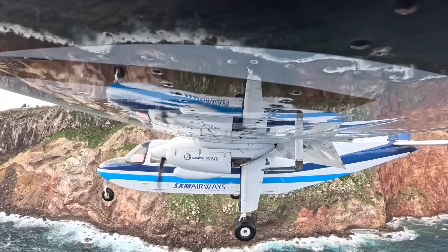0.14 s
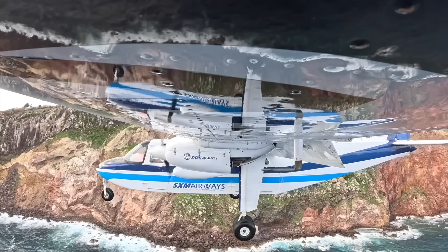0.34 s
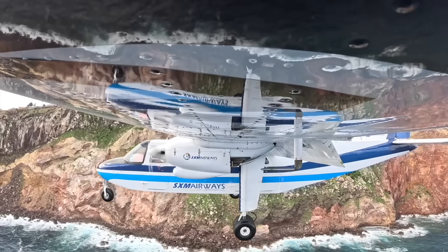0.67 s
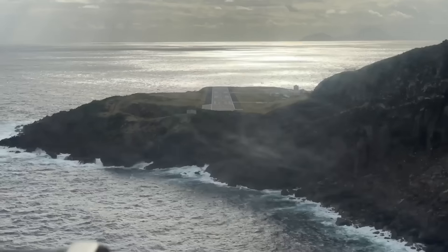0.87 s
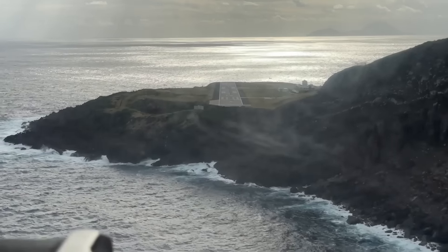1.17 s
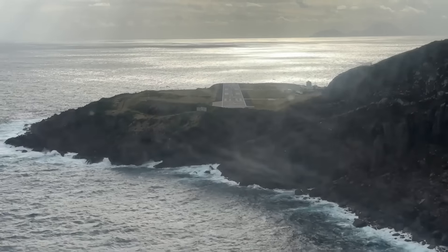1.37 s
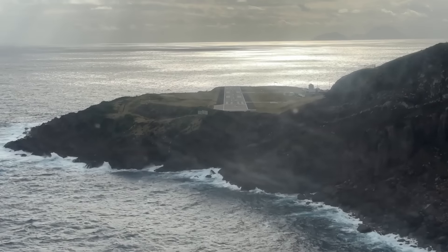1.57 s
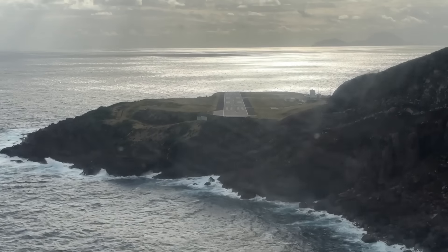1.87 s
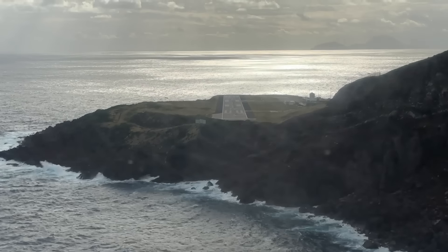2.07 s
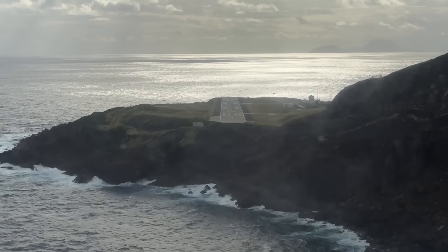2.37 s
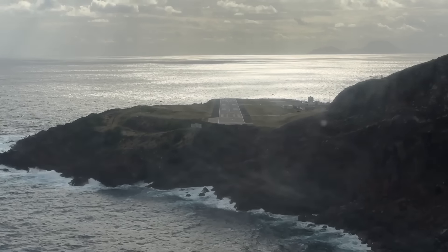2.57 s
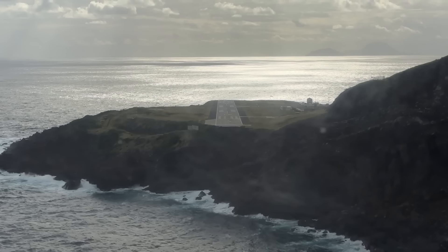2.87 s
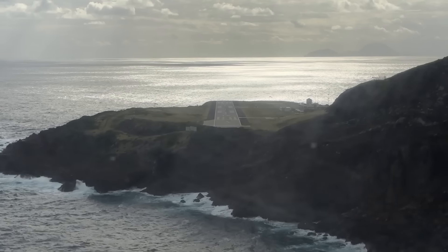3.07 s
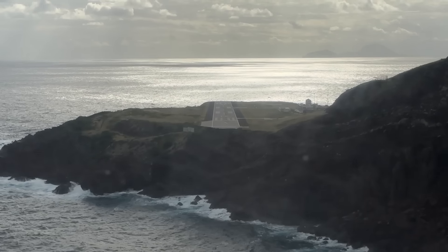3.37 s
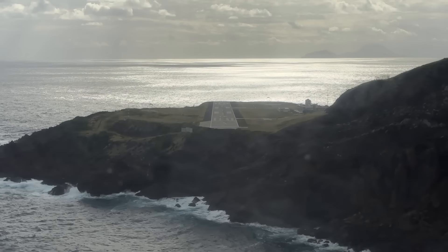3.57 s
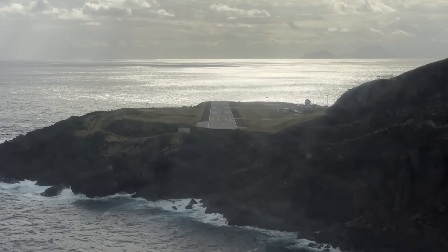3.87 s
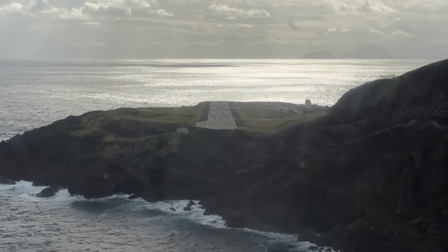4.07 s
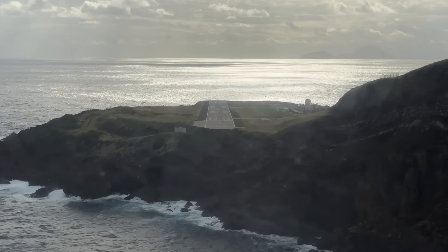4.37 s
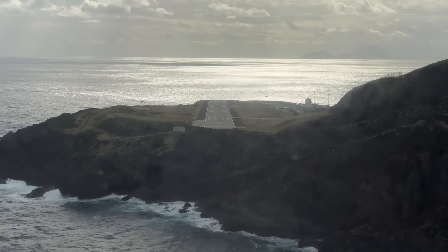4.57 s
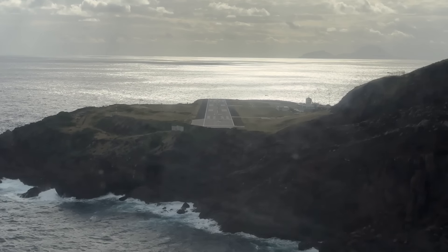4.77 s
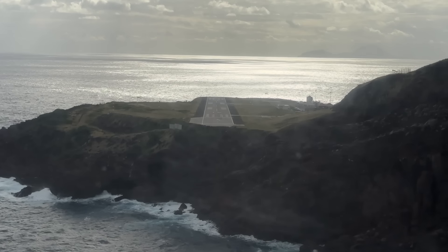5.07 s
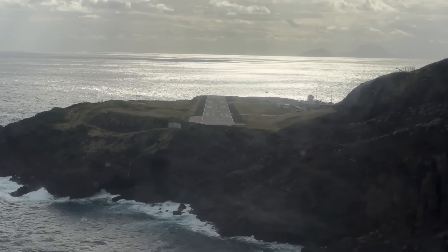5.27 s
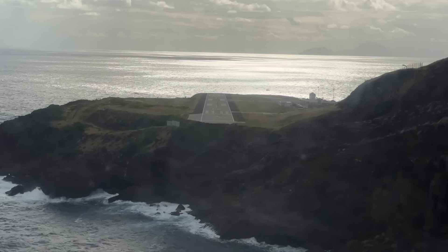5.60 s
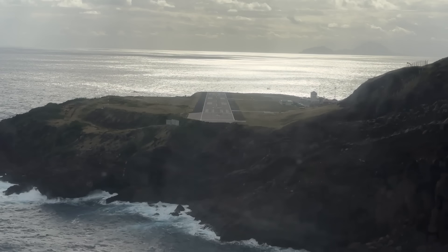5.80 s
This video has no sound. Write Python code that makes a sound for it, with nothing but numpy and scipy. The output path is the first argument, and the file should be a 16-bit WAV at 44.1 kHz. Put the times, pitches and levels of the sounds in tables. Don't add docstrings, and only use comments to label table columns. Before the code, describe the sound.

From 0 to about 0.78 seconds, a light twin-propeller plane is heard close outside in open air: a deep, uneven exhaust bark, breathy roar, and a whine climbing from about 2.07 to 2.19 kHz, the loud peaks softly rounded. An almost instant cut enters the cabin. Two piston engines a few per cent apart drone with boomy low resonance and a quick throbbing beat. The nearer engine's whine glides from about 2.58 kHz to 2.69 by 4 seconds; the farther one is fainter and lower. Slipstream rushes underneath, crisp trim hiss flickers with the blades, slowly weakening and settling slightly near 3.1. Brief, faint panel buzzes around 600 Hz come and go, mostly from 1.3 to 4.6 and again after 5.6. Very thin high tones persist, one growing until 4. From 4.6 the near engine rises towards 2.85 kHz, rumble swelling slightly, still running at the end, about 5.9.

```python
import sys
import numpy as np
from scipy import signal
from scipy.fft import rfft, irfft
from scipy.io import wavfile
from scipy.ndimage import uniform_filter1d

SR = 44100
rng = np.random.default_rng(int(sys.argv[2]) if len(sys.argv) > 2 else 0)


def wav_out(sig):
    wavfile.write(sys.argv[1], SR, np.round(np.clip(np.atleast_2d(sig).T, -1, 1) * 32767).astype(np.int16))


def boost_factor(decibels):
    exponent = np.asarray(decibels, float) / 20
    return 10 ** exponent


N = 261954

# (time [s], whine [Hz], blade thrust [dB])
NEAR_ENGINE = [(.84, 2577.3, -3.5), (1.34, 2614.8, -.7), (1.59, 2629.3, .1), (1.84, 2642.3, .1),
               (2.34, 2664.3, 0), (2.84, 2676.7, .3), (3.34, 2685.2, -.2), (4.09, 2693.7, -1.3),
               (4.59, 2696.9, -.8), (4.84, 2733.8, -.7), (5.09, 2770.2, -1.2), (5.34, 2796.1, -2.1),
               (5.59, 2824.4, -1.8), (5.89, 2847.0, -1)]
# (time [s], whine [Hz], blade thrust [dB])
FAR_ENGINE = [(.84, 2387.5, 4.2), (1.14, 2419.4, 3.7), (1.74, 2463.4, 1), (2.04, 2470, -.1),
              (2.64, 2505.1, -1.5), (3.24, 2513, -.5), (4.14, 2524.3, -.4), (5.04, 2527.2, -.3),
              (5.64, 2552.4, .6), (5.89, 2556.5, 1)]
# (multiple of shaft rate [1], level [dB])
NEAR_ORDERS = [(2, -32), (3, -35), (4, -24), (4.5, -40), (5, -56), (5.5, -48), (6, -27.7), (7, -57),
               (8, -52), (9, -62), (10, -45), (12, -49), (14, -50), (15, -62), (16, -62), (21, -64)]
FAR_ORDERS = [(3, -43), (4, -38), (4.5, -47), (6, -37), (2, -46), (7, -52), (8, -57), (9, -57), (10, -47),
              (12, -53), (15, -61), (16, -60)]
# (frequency [Hz], gain [dB])
CABIN_MODES = [(64, 0), (67, 4), (72.5, -4), (74, -10), (98, 0), (101.5, 3), (105, -2), (107, 2), (111, 7),
               (118, 7), (124, 0), (283, 0), (291, 5), (306, 0)]
# (frequency [Hz], density [dB per Hz])
SLIPSTREAM_SPECTRUM = [(30, -20), (50, 8), (80, 4), (130, 12), (200, 6.5), (260, 0.5), (450, -1), (800, -4),
                       (1150, -9.5), (1900, -8.5), (2250, -6), (2900, -11.5), (4400, -16.5), (5800, -20.5)]
# (frequency [Hz], density [dB per Hz])
TRIM_SPECTRUM = [(4800, -3), (5900, -1), (7400, -1), (8800, -4.5), (10500, -1.5), (12000, -3.5),
                 (14000, -6), (15750, -7)]
# (frequency [Hz], width [Hz], level [dB])
PANEL_MODES = [(642, 24, 0), (612, 25, -12)]
# (middle [s], length [s], level [dB])
BUZZ_SPELLS = [(1.322, .02, -46), (1.44, .03, -40.5), (1.532, 0.018, -45), (1.72, .04, -44),
               (1.92, .04, -47), (2.1, .04, -45), (2.25, .06, -47), (2.64, .08, -46), (2.873, .12, -45),
               (3.05, .03, -44), (3.22, .12, -45), (3.436, .05, -42), (3.604, .08, -46.5),
               (3.867, .03, -48), (4.01, .12, -43), (4.18, .04, -42.5), (4.42, .06, -47), (4.6, .03, -47),
               (5.6, .02, -43), (5.69, .03, -43), (5.84, .05, -42)]
# (frequency [Hz], level [dB])
CABIN_TONE = [(10544, -69.5)]
# (time [s], level [dB])
TONE_SWELL = [
    (1.6, -7),
    (3.8, -3),
    (4, 1.5),
]
# (frequency [Hz], level [dB])
INSTRUMENTS = [(9322, -80), (10907, -73), (11445, -74)]
# (time [s], shaft rate [Hz])
OUTSIDE_SHAFT = [
    (0, 33.7),
    (.25, 33.7),
    (.5, 34.0),
    (.77, 34.1),
]
# (multiple of shaft rate [1], level [dB])
EXHAUST_ORDERS = [(2, -37), (3, -24.5), (3.5, -42), (4, -38), (4.5, -33), (5.5, -36), (6, -30.5),
                  (6.5, -41), (7, -35), (7.5, -41), (8.5, -43), (9, -46), (10, -43), (11.5, -41), (12, -42),
                  (14.5, -43)]
# (time [s], frequency [Hz])
OUTSIDE_WHINE = [(.05, 2068.1), (.17, 2074.1), (.29, 2086.8), (.41, 2106.4), (.53, 2129.9), (.65, 2163.1),
                 (.72, 2178.1), (.78, 2192)]
# (multiple of whine [1], level below whine [dB])
OUTSIDE_OVERTONES = [(3, -27), (4, -37)]
# (frequency [Hz], density [dB per Hz])
ROAR_SPECTRUM = [(30, -30), (55, -14), (90, -8.5), (220, -9.5), (500, -15.5), (1000, -21), (2000, -22.5),
                 (3500, -28), (4500, -35), (6400, -48.5), (7200, -54), (9000, -59), (11000, -57.5),
                 (15700, -63)]
# (frequency [Hz], level [dB])
AIRFRAME_WHISTLES = [(1174, -52), (2449, -55), (3090, -58)]
# (frequency [Hz], gain [dB])
OPEN_AIR = [(20, 0), (20000, 0)]

CUT_S = .776
GEARING, FAR_GEARING, SETTLED_HZ = 76.96, 76.88, 2690
HULL_LAG, FAR_HULL_LAG = np.pi / 18, .044
FAR_START, BURST_LAG = -.52, 3.6
SHARPEN_DB_PER_HZ = .005, .003
RUMBLE_DB_PER_HZ = .08, .0069
NEAR_WHINE_DB, NEAR_SECOND_DB, WHINE_FADE_DB_PER_S = -40, -53.1, .38
FAR_WHINE_DB, FAR_SECOND_DB, FAR_SECOND_FOLLOWS = -59.5, -60, .53
AIR_DB, HISS_DB, SLOWING_DB_PER_S, HISS_FOLLOWS = -46.5, -51.2, .3047, 1.3
TRIM_SETTLES_S, TRIM_SETTLES_DB = 3.08, .5
PANEL_REST_DB, SPELL_EDGE_S, PANEL_STEADY = -49, .02, .7
ROAR_DB, OUTSIDE_WHINE_DB, OUTSIDE_SECOND_DB = -32.5, -39, -56.5
OVERLOAD = .45


def in_time(rows):
    s, *columns = np.transpose(rows)
    return [np.interp(np.arange(N) / SR, s, c) for c in columns]


def cabin_time():
    return np.arange(N) / SR - CUT_S


def with_power(slopes_db):
    off_hz = in_time(NEAR_ENGINE)[0] - SETTLED_HZ
    return np.where(off_hz < 0, *slopes_db) * off_hz


def turns(hz):
    return 2 * np.pi * np.cumsum(hz) / SR


def drift(rate):
    r = np.exp(-80 * np.pi * rate / SR)
    slow = signal.lfilter([1], [1, -2 * r, r * r], rng.standard_normal(N // 40 + 2002))[2000:]
    return np.interp(np.arange(N) / 40, np.arange(len(slow)), slow / slow.std())


def coloured(spectrum, low_hz, high_hz):
    hz = np.arange(N // 2 + 1) * SR / N + 1e-3
    at, db = np.transpose(spectrum)
    shape = boost_factor(np.interp(np.log(hz), np.log(at), db, left=-80, right=-80))
    within = (hz > low_hz) & (hz < high_hz)
    rms = np.sqrt(np.sum(shape[within] ** 2) / len(hz))
    return irfft(rfft(rng.standard_normal(N)) * shape, N) / rms


def whine(phase, db, wobble_db):
    level = np.sqrt(2) * boost_factor(db + wobble_db * drift(40))
    return level * np.sin(phase + .15 * drift(30))


def tones(table):
    return sum(whine(turns(np.full(N, hz)), db, 1.6) for hz, db in table)


def slipstream(slowing_db):
    air = boost_factor(AIR_DB + slowing_db + .6 * drift(8)) * coloured(SLIPSTREAM_SPECTRUM, 800, 2000)
    rumble = signal.sosfiltfilt(signal.butter(2, 600, fs=SR, output="sos"), air)
    return air + (boost_factor(with_power(RUMBLE_DB_PER_HZ)) - 1) * rumble


def trim_hiss(shaft, slowing_db):
    settled = np.clip((cabin_time() + CUT_S - TRIM_SETTLES_S) / .1, 0, 1)
    hiss_db = HISS_DB + HISS_FOLLOWS * slowing_db + .3 * drift(4) - TRIM_SETTLES_DB * settled
    angle = shaft - BURST_LAG
    passing = np.exp(1.5 * (np.cos(2 * angle) - 1)) * (1 + .4 * np.cos(angle))
    burst = 1 + .65 * passing * boost_factor(1.5 * drift(25) + 1.5 * (hiss_db - hiss_db.mean()))
    return boost_factor(hiss_db) * coloured(TRIM_SPECTRUM, 6000, 15000) * burst / np.sqrt(np.mean(burst ** 2))


def buzz_gain():
    t, gain = np.arange(N) / SR, boost_factor(PANEL_REST_DB)
    for middle_s, length_s, db in BUZZ_SPELLS:
        beyond_s = np.maximum(abs(t - middle_s) - length_s / 2, 0)
        gain = gain + boost_factor(db) * np.exp(-.5 * (beyond_s / SPELL_EDGE_S) ** 2)
    return gain


def panel_buzz():
    buzz = 0
    for hz, width_hz, db in PANEL_MODES:
        r = np.exp(-np.pi * width_hz / SR)
        mode = [.94, 0, -.993, 1, -2 * r * np.cos(2 * np.pi * hz / SR), r * r]
        ring = signal.sosfilt([mode] * 2, rng.standard_normal(N))
        power = uniform_filter1d(ring ** 2, size=SR // 40) + .05 * ring.var()
        ring = ring / power ** (PANEL_STEADY / 2)
        buzz = buzz + boost_factor(db) * ring / ring.std()
    return boost_factor(-4.5) * buzz_gain() * buzz


def cabin_noise(shaft):
    slowing_db = -SLOWING_DB_PER_S * cabin_time()
    return slipstream(slowing_db) + trim_hiss(shaft, slowing_db) + panel_buzz()


def orders(shaft_hz, table, space, wobble_db, sharp_db=0, hull_lag=HULL_LAG, start=0):
    out, phase = 0, turns(shaft_hz) + start
    for multiple, db in table:
        level_db = db + sharp_db * np.clip(2 * multiple - 20, 0, 8) + wobble_db * drift(6)
        level_db += np.interp(multiple * shaft_hz, *np.transpose(space))
        lag = hull_lag * multiple ** 2 + np.pi / 2 * (multiple % 2 != 0)
        out = out + np.sqrt(2) * boost_factor(level_db) * np.cos(multiple * phase - lag)
    return out


def far_engine(sharp_db):
    hz, thrust_db = in_time(FAR_ENGINE)

    def part(rows):
        return orders(hz / FAR_GEARING, rows, CABIN_MODES, .8, sharp_db, FAR_HULL_LAG, FAR_START)

    low, blades, high = part(FAR_ORDERS[:4]), part(FAR_ORDERS[4:5]), part(FAR_ORDERS[5:])
    engine = boost_factor(thrust_db) * low + (high - blades) / boost_factor(thrust_db.clip(0))
    second_db = FAR_SECOND_DB + FAR_SECOND_FOLLOWS * thrust_db
    return engine + whine(turns(hz), FAR_WHINE_DB, 1.2) + whine(2 * turns(hz), second_db, 1.2)


def near_engine(sharp_db):
    hz, thrust_db = in_time(NEAR_ENGINE)
    shaft = turns(hz / GEARING)
    engine = boost_factor(thrust_db) * orders(hz / GEARING, NEAR_ORDERS, CABIN_MODES, .5, sharp_db)
    belt_db = 1.1 * np.cos(shaft)
    whine_db = NEAR_WHINE_DB - WHINE_FADE_DB_PER_S * cabin_time() + belt_db
    engine += whine(turns(hz), whine_db, .35) + whine(2 * turns(hz), NEAR_SECOND_DB, .9)
    return engine, shaft


def cabin_engines():
    sharp_db = with_power(SHARPEN_DB_PER_HZ)
    near, shaft = near_engine(sharp_db)
    return near + far_engine(sharp_db), shaft


def outside():
    shaft_hz = in_time(OUTSIDE_SHAFT)[0]
    exhaust = orders(shaft_hz, EXHAUST_ORDERS, OPEN_AIR, .8)
    puffs = 1 + .04 * np.cos(3 * turns(shaft_hz))
    roar = boost_factor(ROAR_DB + .3 * drift(4.4)) * puffs * coloured(ROAR_SPECTRUM, 720, 1850)
    phase = turns(in_time(OUTSIDE_WHINE)[0])
    geared = whine(phase, OUTSIDE_WHINE_DB, .9) + whine(2 * phase, OUTSIDE_SECOND_DB, 2.5)
    geared += sum(whine(k * phase, OUTSIDE_WHINE_DB + db, 1.5) for k, db in OUTSIDE_OVERTONES)
    pressure = exhaust + roar + geared + tones(AIRFRAME_WHISTLES)
    return OVERLOAD * np.tanh(pressure / OVERLOAD)


def scene():
    engines, shaft = cabin_engines()
    cabin_tone = boost_factor(in_time(TONE_SWELL)[0]) * tones(CABIN_TONE)
    cabin = engines + cabin_noise(shaft) + cabin_tone
    inside = np.clip(cabin_time() / .004 + .5, 0, 1)
    return (inside * cabin + (1 - inside) * outside() + tones(INSTRUMENTS))[None]


def band_limit(x):
    return signal.sosfilt(signal.butter(12, 15800, fs=SR, output="sos"), x)


def record(dry):
    return band_limit(dry)


dry = scene()
out = record(dry)
wav_out(out)
```